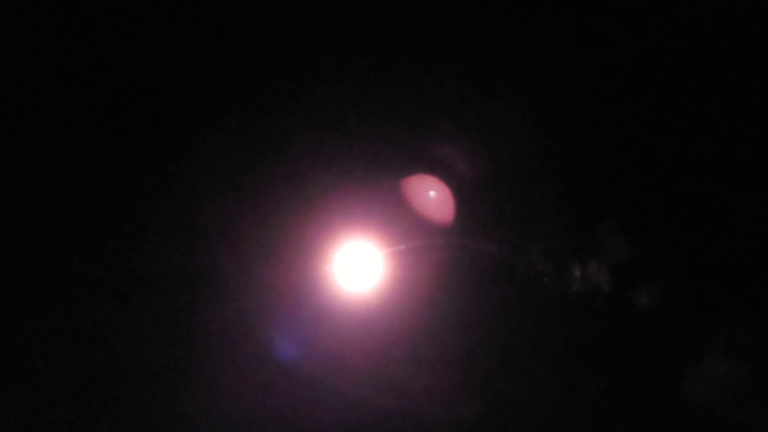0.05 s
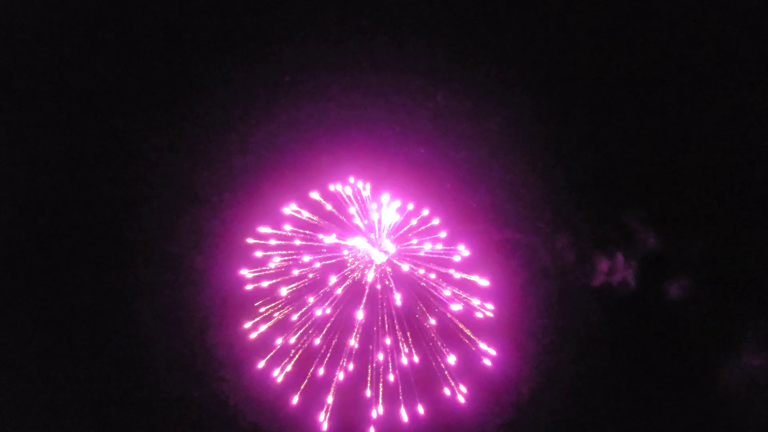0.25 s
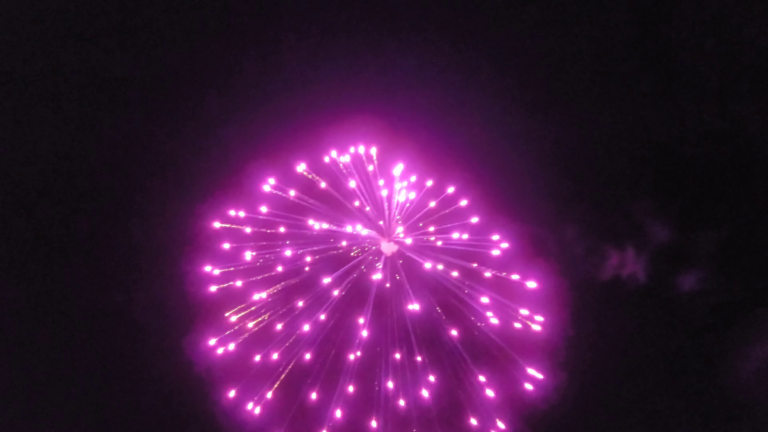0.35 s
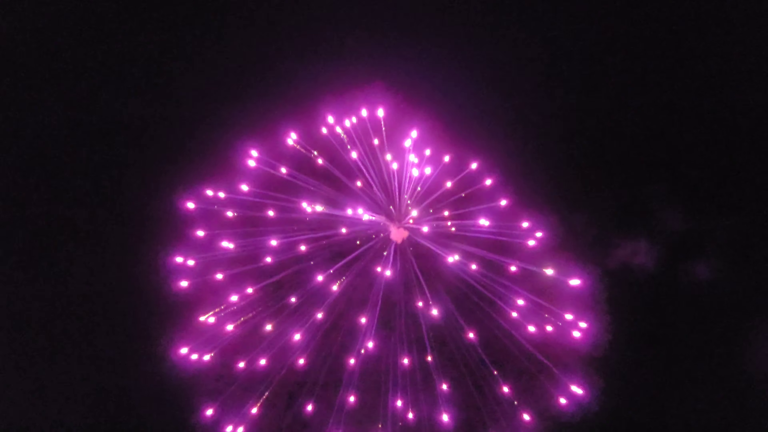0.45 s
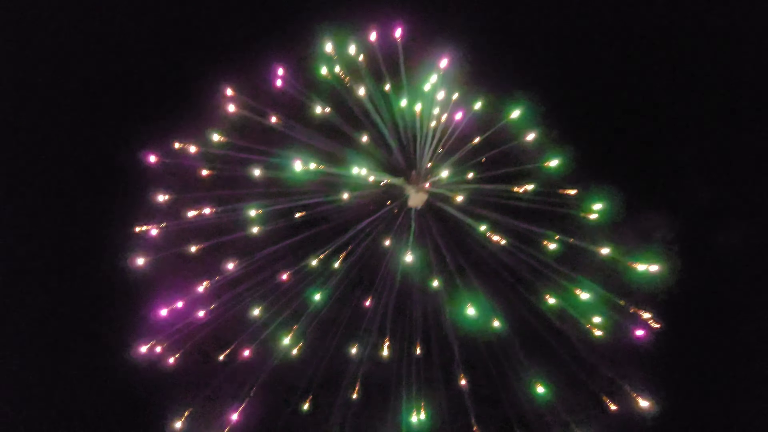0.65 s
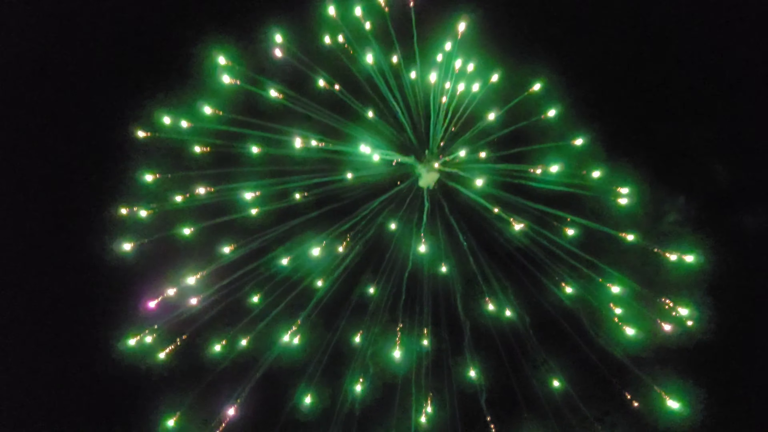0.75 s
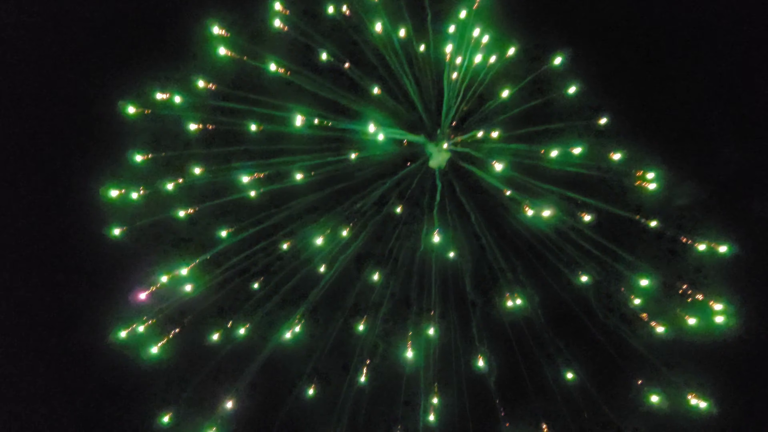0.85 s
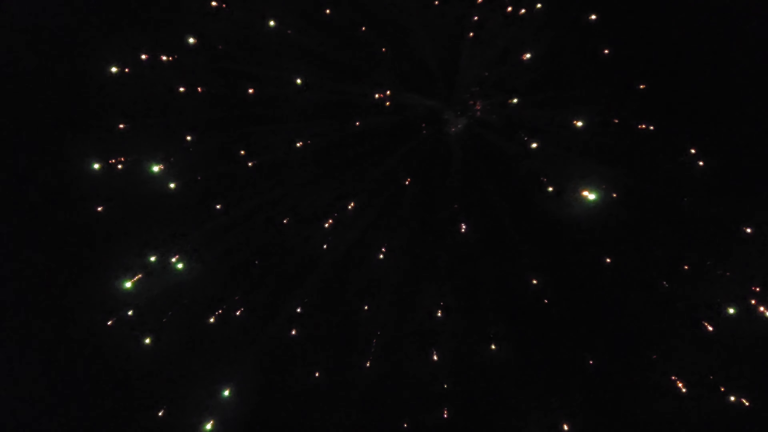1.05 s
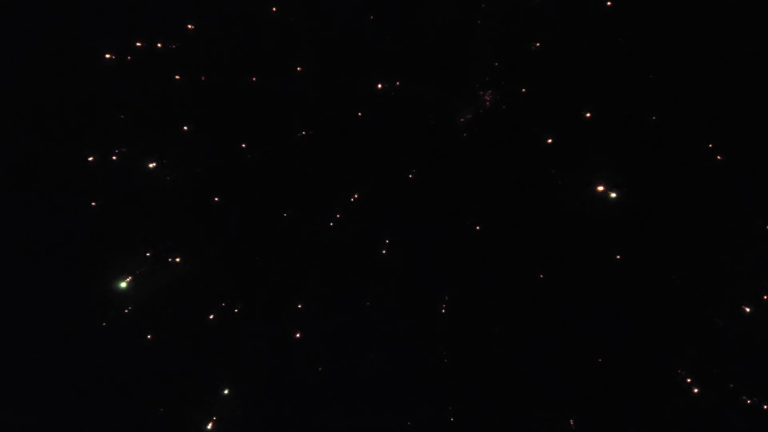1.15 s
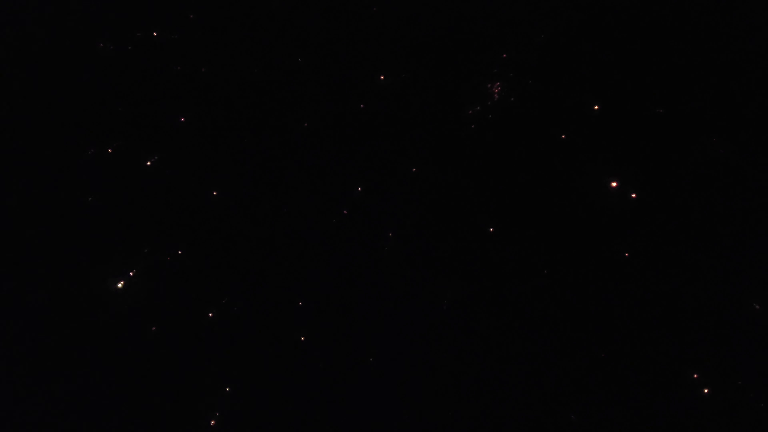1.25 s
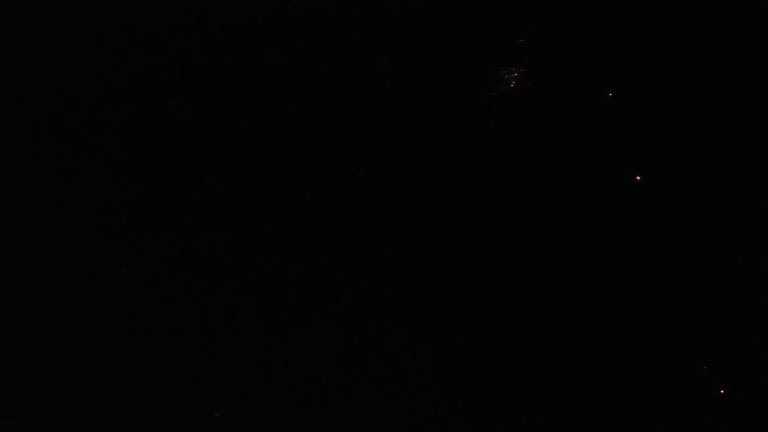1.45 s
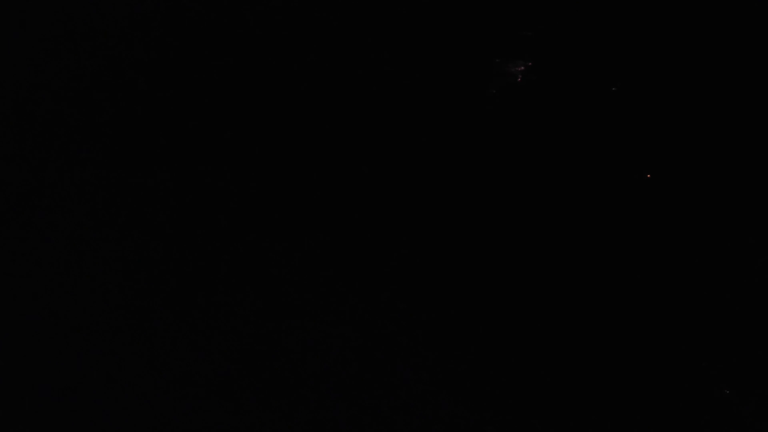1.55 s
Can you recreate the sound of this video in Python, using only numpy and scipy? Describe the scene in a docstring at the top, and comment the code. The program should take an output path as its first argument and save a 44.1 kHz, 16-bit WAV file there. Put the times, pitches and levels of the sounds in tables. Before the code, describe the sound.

A firework shell explodes about 0.25 seconds in, breaking the quiet night air with one sharp, loud bang and a low thump. Quick echoes slap off nearby surfaces until about 0.4 seconds. A dull rumble then rolls back from far away, swelling around 0.5 and 0.7 seconds and fading through 1.5 seconds and beyond. A very faint, high cricket chirps throughout.

```python
"""A firework shell bursts in the open on a quiet night: a shock wave, its ground and wall reflections, a thump.
The crack scatters off things near the stereo microphones and dies treble first,
while a dull rumble rolls back from far away. A bush cricket chirps throughout.
The recorder's gain control ducks at the bang, holds and slowly comes back."""
import sys
import numpy as np
from scipy import signal
from scipy.io import wavfile
from scipy.ndimage import uniform_filter1d, minimum_filter1d

SR = 44100
rng = np.random.default_rng(int(sys.argv[2]) if len(sys.argv) > 2 else 0)


def transcribe(u):
    """Save the signal u as a 16-bit wav file named by the first command-line argument.

    u: samples, shape (n,) or (channels, n), limited to [-1, 1]; the rate is SR.
    q: integer samples, one column per channel.
    """
    v = np.clip(np.atleast_2d(u).T, -1, 1)
    q = np.round(v * 32767).astype(np.int16)
    wavfile.write(sys.argv[1], SR, q)


N = 70560
T = np.arange(N) / SR
BANG_DB = 21   # added to the level of the burst and all its echoes
SHOCK_LAG_S = .0001   # left microphone behind right


def amp(db):
    """Decibels to gain."""
    return 10 ** (np.asarray(db) / 20)


def unit(x):
    """Scale to rms 1."""
    return x / np.sqrt(np.mean(x ** 2) + 1e-20)


def butter(x, hz, kind, order=2):
    """Causal Butterworth filter."""
    sos = signal.butter(order, np.clip(hz, 10, .48 * SR), kind, fs=SR, output="sos")
    return signal.sosfilt(sos, x + 1e-18)


def pan(db):
    """Left and right gains for a level difference."""
    return amp([[db / 2], [-db / 2]])


def from_right(x, lag_s=.00047):
    """Sound from the right reaches the left microphone later."""
    return np.array([np.interp(T - round(lag_s * SR) / SR, T, x, left=0), x])


def swell(start_s, rise_s, t60):
    """Envelope that rises from a start time and dies away."""
    age = np.maximum(T - start_s, 0)
    return (1 - np.exp(-age / rise_s)) * amp(-60 * age / t60)


# How alike diffuse sound is at the two microphones: (frequency [Hz], likeness [0-1])
MIC_LIKENESS = [(60, 0.9), (280, 1), (600, 0.1), (1400, 0.86), (4000, .25), (14000, 0)]

def bands(table, grain_db):
    """Diffuse, grainy stereo noise in half octaves: yields Hz, the band at its level, further columns."""
    table, likeness = np.array(table), np.array(MIC_LIKENESS)
    edges = 22 * 2 ** np.arange(0, 10, .5)
    knots = np.arange(0, N, 40)
    grain = unit(amp(grain_db * np.interp(np.arange(N), knots, rng.standard_normal(len(knots)))))
    white = rng.standard_normal((2, 3, N)) * grain
    for k, (low, high) in enumerate(zip(edges, edges[1:])):
        hz = np.sqrt(low * high)
        level, *rest = [np.interp(np.log(hz), np.log(table[:, 0]), column) for column in table.T[1:]]
        alike = np.interp(np.log(hz), np.log(likeness[:, 0]), likeness[:, 1])
        noise = unit(butter(white[k % 2], [low, high], "band", order=3))
        stereo = np.sqrt(alike) * from_right(noise[0]) + np.sqrt(1 - alike) * noise[1:]
        yield hz, amp(level) * stereo, rest


# Night air all around the microphones: (frequency [Hz], level per half octave [dB])
NIGHT_AIR = [(30, -67), (65, -60.5), (150, -65), (350, -62), (800, -56), (1670, -62), (2370, -82),
             (3350, -68), (4700, -74), (7000, -73.5), (14000, -78.5)]

def night(tick_s=1.104, tick_db=-43, tick_decay_s=.004):
    """Steady night air and one faint tick."""
    envelope = (T >= tick_s) * np.exp(-np.maximum(T - tick_s, 0) / tick_decay_s)
    tick = amp(tick_db) * envelope * rng.standard_normal((2, N))
    return tick + sum(noise for _, noise, _ in bands(NIGHT_AIR, grain_db=.5))


def cricket(hz=11550, width_hz=1750, db=-59, chorus_db=-66):
    """Uneven two-syllable rasps in one high resonance, over a steady chorus of crickets farther off."""
    first_s, every_s, gap_s, syllable_s = .064, .1305, .038, .0082
    spread_db, jitter_s = 1.5, .0038
    starts = [s + k * gap_s for s in np.arange(first_s, T[-1], every_s) for k in range(2)]
    rasp = butter(rng.standard_normal((2, N)), [hz - width_hz / 2, hz + width_hz / 2], "band")
    syllables = sum(amp(db + spread_db * loud) * np.exp(-.5 * ((T - s - jitter_s * late) / syllable_s) ** 2)
                    for s, (loud, late) in zip(starts, rng.standard_normal((len(starts), 2))))
    return np.hypot(syllables, amp(chorus_db)) * unit(rasp)


# Rumble from far away: (frequency [Hz], level per half octave [dB], t60 [s])
FAR_RUMBLE = [(29.8, -78, 0.97), (85.4, -60, 2.5), (174.6, -57.5, 2.73), (287, -36.5, 2.54),
              (414, -35, 2.07), (558, -49, 3.48), (950, -46, 2.67), (1980, -56, 2.92), (3320, -63.5, 3.12),
              (4600, -73, 3.4), (6890, -70.5, 1.65), (14000, -78, 1.1)]
# Distant returns that feed it: (time [s], level [dB], rise [s])
FAR_RETURNS = [(0.409, -7.5, .04), (.495, -2.5, 0.004), (.66, -9.5, 0.022), (1.478, -18.5, 0.022)]
# Single far echoes that stand out of it: (time [s], level [dB])
FAR_ROLLS = [(.53, -6.5), (.69, -3.5), (.93, -15.5), (1.12, -15.5)]

def rumble(roll_width_s=.026, roll_top_hz=690):
    """Echoes roll back in overlapping swells, their treble lost over the distance."""
    roll_power = sum(amp(db) ** 2 * np.exp(-((T - s) / roll_width_s) ** 2) for s, db in FAR_ROLLS)
    out = 0
    for hz, noise, (t60,) in bands(FAR_RUMBLE, grain_db=1.5):
        return_power = sum((amp(db) * swell(s, rise_s, t60)) ** 2 for s, db, rise_s in FAR_RETURNS)
        out += noise * np.sqrt(roll_power / (1 + (hz / roll_top_hz) ** 2) + return_power)
    return out


# Scatter from the nearby surroundings: (frequency [Hz], level per half octave [dB], t60 [s])
NEAR_SCATTER = [(30, -51, .4), (65.4, -31, 0.42), (154.4, -31, 0.44), (316, -24, 0.75), (590, -35.5, 1.24),
                (1000, -37.5, 1.25), (2000, -38, 1.03), (2790, -39, 1.08), (3700, -38.5, 1.07),
                (5800, -39, 0.59), (9600, -43.5, 0.6), (14030, -34, 0.29)]

def scatter(near_low_hz=340, walls_db=-5, walls_top_hz=4470):
    """Countless small echoes: first off near things too small to return bass, then off walls or trees."""
    out = 0
    for hz, noise, (t60,) in bands(NEAR_SCATTER, grain_db=2):
        near = swell(start_s=.2578, rise_s=.005, t60=t60) / (1 + (near_low_hz / hz) ** 2)
        walls = swell(start_s=.297, rise_s=.0087, t60=t60) / (1 + (hz / walls_top_hz) ** 2)
        out += noise * np.hypot(near, amp(walls_db) * walls)
    return out


# Bright slaps off hard faces close by: (time [s], level [dB], centre [Hz])
CLOSE_SLAPS = [(.258, -33, 3600), (.306, -26, 2010), (.305, -31, 3700), (0.38, -31.5, 2080),
               (.363, -28.5, 1050)]

def slaps(edge_ratio=1.174):
    """Rough faces smear the crack into short, coloured bursts."""
    out = 0
    for s, db, hz in CLOSE_SLAPS:
        noise = unit(butter(rng.standard_normal((2, N)), [hz / edge_ratio, hz * edge_ratio], "band"))
        out += amp(db) * swell(s, rise_s=.00087, t60=.057) * noise
    return out


def knock(time_s=.3068, hz=310, db=-11, width_s=.005):
    """A stepped surface returns the shock as a quick run of echoes that merge into a pitched knock."""
    age = T - time_s
    envelope = amp(db) * np.exp(-(age / width_s) ** 2)
    return from_right(envelope * np.cos(2 * np.pi * hz * age), SHOCK_LAG_S)


def thump(start_s=.2535, hz=60, db=-9, rise_s=.0047):
    """A couple of slow pressure swings follow the shock."""
    age = np.maximum(T - start_s, 0)
    envelope = amp(db) * age / rise_s * np.exp(1 - age / rise_s)
    return from_right(-envelope * np.sin(2 * np.pi * hz * age), SHOCK_LAG_S)


def crack(start_s=.2473):
    """The ragged shock front is bright noise; things right beside the microphones add a duller rattle."""
    front_db, front_decay_s, front_low_hz = -17.5, .0009, 2800
    rattle_db, rattle_decay_s, rattle_top_hz = -7.5, .0036, 1050
    age = np.maximum(T - start_s, 0)
    front, rattle = from_right(1.0 * (T >= start_s)) * rng.standard_normal((2, 2, N))
    front = butter(front * np.exp(-age / front_decay_s), front_low_hz, "high", order=1)
    rattle = butter(rattle * np.exp(-age / rattle_decay_s), rattle_top_hz, "low", order=1)
    return amp(front_db) * front + amp(rattle_db) * rattle


# The direct shock, then its reflections off the ground and nearby walls:
# (time [s], level [dB], N-wave length [ms], treble limit [Hz], left over right [dB])
SHOCK_ARRIVALS = [(0.2476, 0.5, 2.4, 7200, 6), (0.2514, -11.5, 6.5, 1420, -3.5),
                  (0.2584, 5.5, 1.94, 380, 3), (0.266, -10.5, 3.1, 470, 3.5), (0.2997, -14, 2.2, 2000, -8),
                  (.3570, -19, 5.6, 1200, -2)]

def shocks(low_hz=97, rounding_ms=.4):
    """Each arrival is an N-wave: a jump in pressure, a slide into suction and a rounded return."""
    out = 0
    for s, db, length_ms, top_hz, pan_db in SHOCK_ARRIVALS:
        age_ms = (T - s) * 1000
        slide = (age_ms >= 0) * (1 - 2 * age_ms / length_ms)
        rear_edge = .5 * (1 - np.tanh((age_ms - length_ms) / rounding_ms))
        wave = butter(butter(slide * rear_edge, top_hz, "low"), low_hz, "high")
        out += amp(db) * pan(pan_db) * from_right(wave, SHOCK_LAG_S)
    return out


def scene():
    """The burst and its echoes, near and far, over the night background."""
    burst = shocks() + crack() + thump() + knock() + slaps() + pan(db=.5) * (scatter() + rumble())
    return amp(BANG_DB) * burst + night() + cricket()


def record(dry, mic_low_hz=40.5, overload_db=24, cutoff_hz=16000):
    """The microphones lose deep bass and overload; gain control ducks on a peak; the top is cut."""
    limit_db, hold_s, release_db_per_s = 1.5, .88, 7
    mic = amp(overload_db) * np.tanh(butter(dry, mic_low_hz, "high") / amp(overload_db))
    over_db = np.maximum(20 * np.log10(np.abs(mic).max(axis=0) + 1e-9) - limit_db, 0)
    # the gain drops at once, holds, then recovers slowly
    release_db = np.maximum.accumulate(over_db + release_db_per_s * T) - release_db_per_s * (T - hold_s)
    duck_db = np.minimum(np.maximum.accumulate(over_db), release_db)
    duck_db = uniform_filter1d(-minimum_filter1d(-duck_db, size=64), size=64)   # widen, then smooth
    top_cut = signal.ellip(10, .3, 80, cutoff_hz, fs=SR, output="sos")
    return signal.sosfilt(top_cut, mic * amp(-duck_db))


dry = scene()
out = record(dry)
transcribe(out)
```